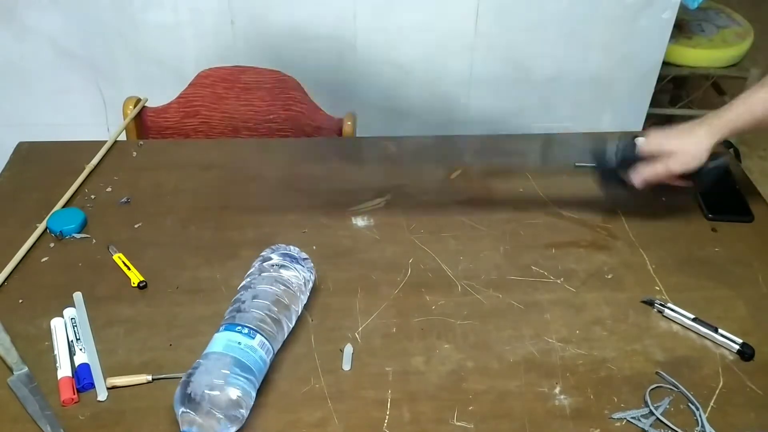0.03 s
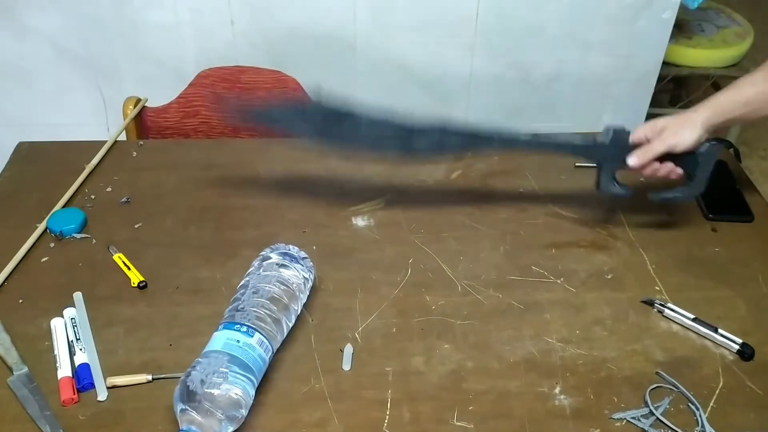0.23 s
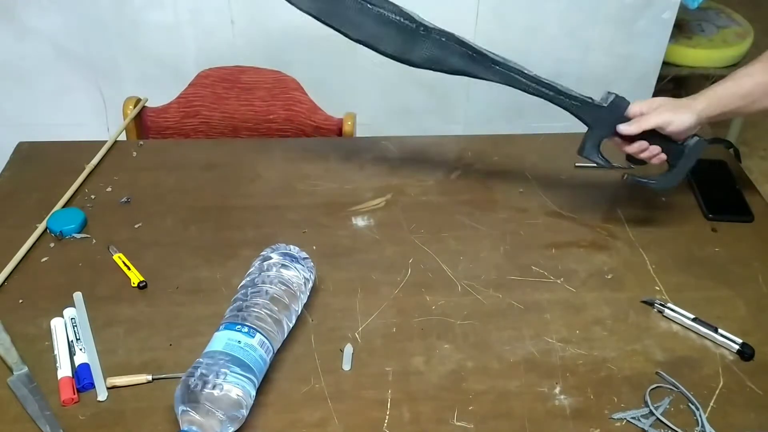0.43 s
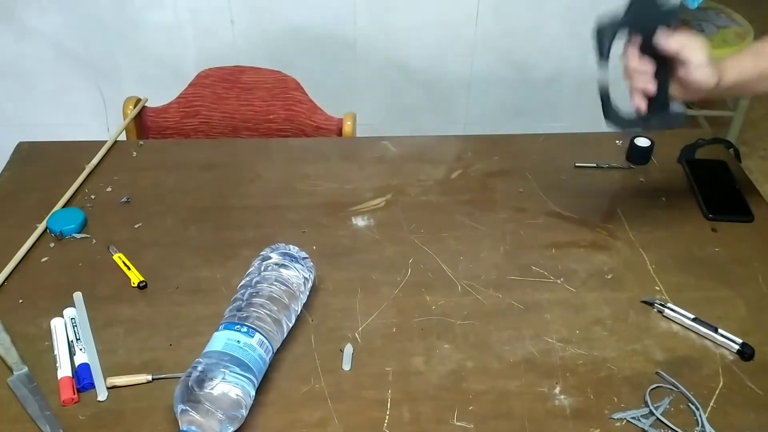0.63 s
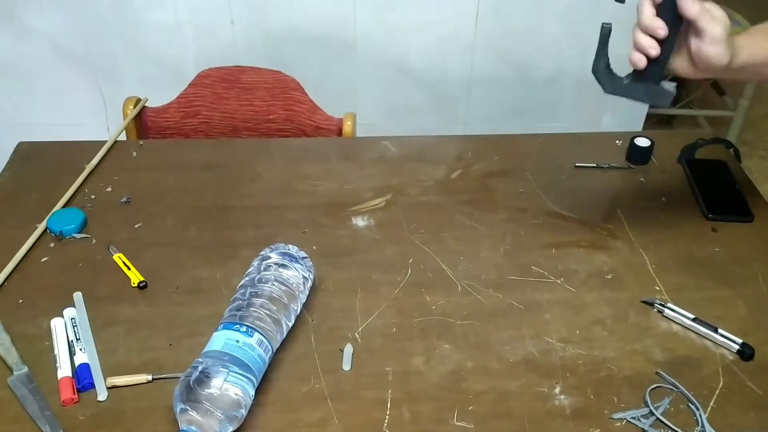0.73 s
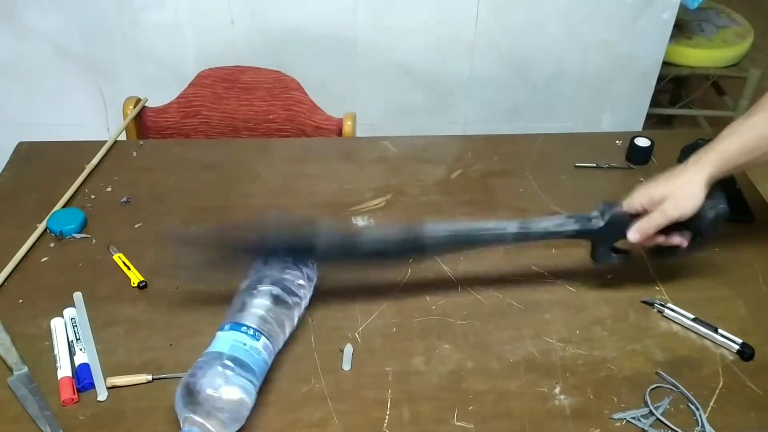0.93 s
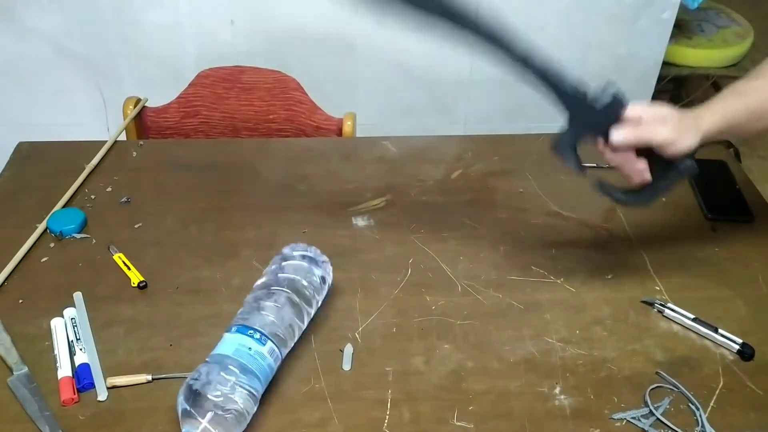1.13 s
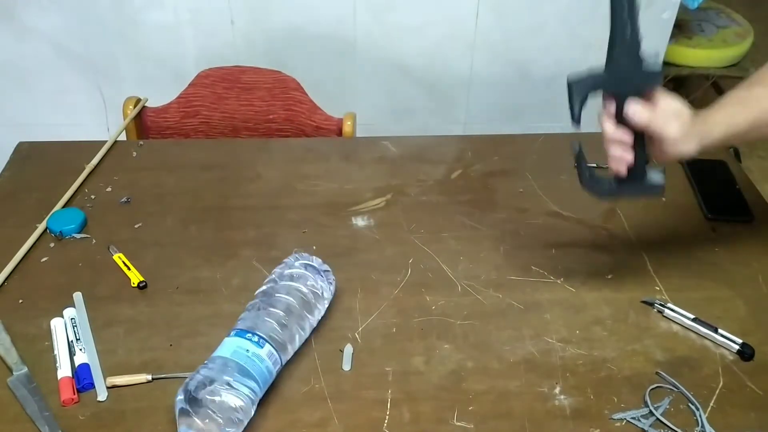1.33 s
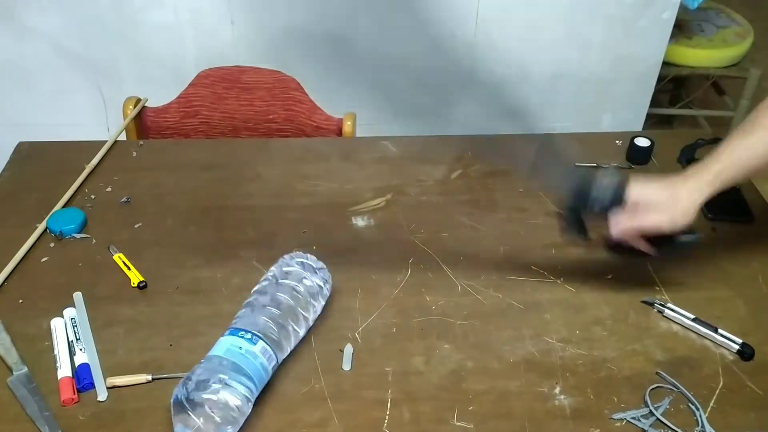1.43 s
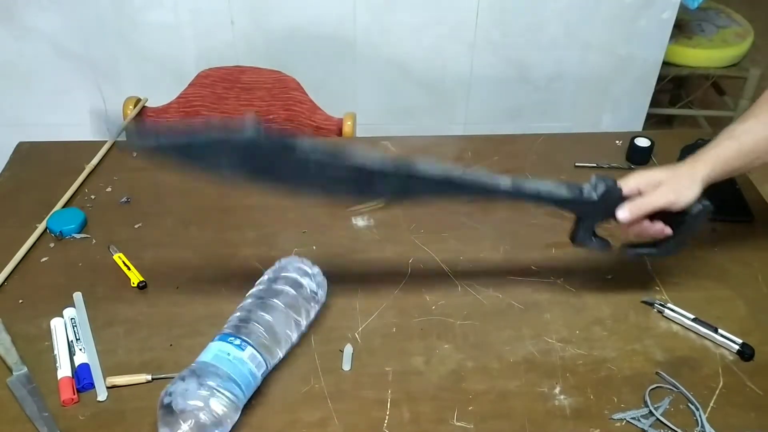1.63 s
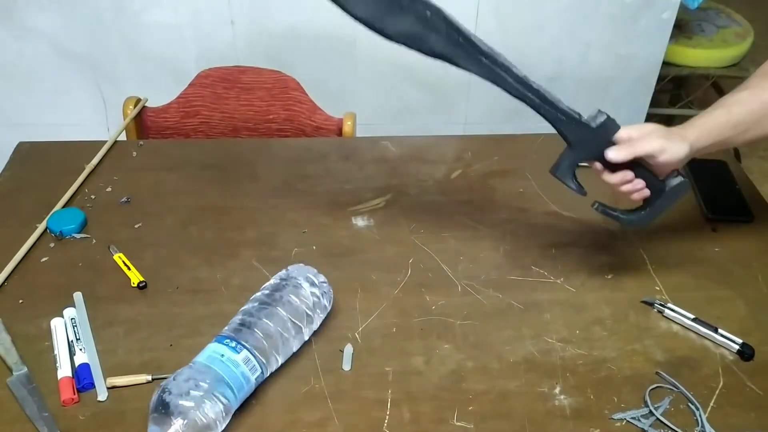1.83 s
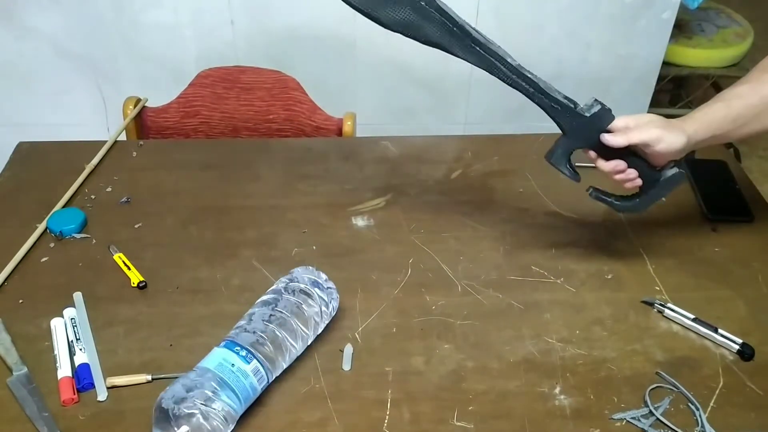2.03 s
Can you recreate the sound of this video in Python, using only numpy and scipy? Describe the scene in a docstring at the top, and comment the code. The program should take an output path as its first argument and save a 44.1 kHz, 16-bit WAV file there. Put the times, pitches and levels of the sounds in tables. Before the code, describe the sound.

A foam sword whacks a wooden table, then slaps a full plastic bottle twice; after each bottle hit it crackles, hops, thuds down and rocks on the wood. Small hard room, close microphone, blows squashed by limiting.

```python
"""In a small hard room, a foam sword slaps a wooden table once, then twice a water-filled plastic bottle on it.
Each slap is a short puff of noise with a bright crack; it sets table and bottle ringing as fading sine waves.
The bottle hops, lands with soft thuds, rocks in dense little knocks and its plastic ticks and crackles.
Faint air noise and a low hum lie beneath; the recorder's limiter flattens each blow."""
import sys
import numpy as np
from scipy import signal
from scipy.fft import rfft, irfft, next_fast_len
from scipy.io import wavfile
from scipy.ndimage import uniform_filter1d, minimum_filter1d

SR = 44100
rng = np.random.default_rng(int(sys.argv[2]) if len(sys.argv) > 2 else 0)


def bounce(signal):
    """Save signal as a 16-bit WAV file at the path given by the first command-line argument."""
    frames = np.transpose(np.atleast_2d(signal))
    limited = np.clip(frames, -1, 1)
    pcm = np.round(limited * 32767).astype(np.int16)
    wavfile.write(sys.argv[1], SR, pcm)


N = 92610

# Levels are those ahead of the limiter; a "fade time" is the time to drop by 60 dB.
# tones of the ringing bottle: (frequency [Hz], relative level [dB], fade time [s])
BOTTLE_TONES = [(59, -6, .5), (146, 0, .55), (200, -6, .4), (260, -5, .4), (506, -6, .3), (662, -7, .3),
                (813, -9, .25), (1030, -11, .2), (1227, -6, .25), (1448, -6, .15), (1626, -8, .2),
                (1888, -8, .13)]
# colour of foam on plastic: (frequency [Hz], relative level [dB])
SLAP_COLOUR = [(35, -26), (60, -9.5), (150, -8), (432, -6.5), (742, -8.5), (938, -9), (1430, -6),
               (10300, -10.5), (15000, -14.5), (16500, -58)]
# colour of a tick or crack: (frequency [Hz], relative level [dB])
TICK_COLOUR = [(2000, 0), (6000, -0.5), (11000, 5.4), (16000, -3)]

SLAP_FADE_S, TICK_FADE_S = 0.0054, 0.003
THUD_RISE_S = 0.005
ROOM_FILL_S = 0.012  # how slowly the room's answer builds up
SLAP_ROOM_DB = 1.5  # room tail relative to the slap itself


def amp(db):
    """Turns decibels into a plain multiplier."""
    return 10 ** (np.asarray(db) / 20)


def unit(x):
    """Scales a sound to an rms (average strength) of 1."""
    return x / np.sqrt(np.mean(x ** 2) + 1e-20)


def along(points, hz):
    """Reads a curve of (frequency, value) points on a logarithmic frequency axis."""
    f, value = np.transpose(points)
    return np.interp(np.log(hz + 1), np.log(f + 1), value)


def filtered(x, response):
    """Multiplies each frequency of a sound by response(frequency)."""
    size = next_fast_len(x.shape[-1] + 8192)
    spectrum = rfft(x, size) * response(np.fft.rfftfreq(size, 1 / SR))
    return irfft(spectrum, size)[..., :x.shape[-1]]


def coloured(noise, colour):
    """Shapes noise to a colour and brings it to rms 1."""
    return unit(filtered(noise, lambda hz: amp(along(colour, hz))))


def stereo_noise(size):
    """Two channels of white noise, alike in the bass and mostly unrelated in the treble."""
    # likeness of left and right: (frequency [Hz], correlation [-1 to 1])
    likeness = [(60, 0.91), (180, 0.98), (550, 0.56), (1650, -0.085), (4970, -0.18), (15000, 0.32)]

    def shares(hz):
        angle = np.arccos(np.clip(along(likeness, hz), -1, 1)) / 2
        return np.array([np.cos(angle), np.sin(angle)])

    mid, side = filtered(rng.standard_normal((2, size)), shares)
    return np.array([mid + side, mid - side])


def room_tail(colour, fill_s):
    """A new stereo room tail: each frequency fades at its own speed and near echoes ripple its spectrum."""
    # how long the room rings: (frequency [Hz], fade time [s])
    fade_times = [(60, 0.49), (160, 0.56), (420, 0.46), (1100, 0.53), (2900, 0.44), (7700, 0.4),
                  (15000, 0.27)]
    ripple_db = 2.5
    noise = coloured(stereo_noise(SR), colour)
    hz, t, z = signal.stft(noise, SR, nperseg=256)
    ripple = ripple_db * rng.standard_normal((len(hz), 1))
    gain = amp(ripple - 60 * t / along(fade_times, hz)[:, None])
    fading = signal.istft(z * gain, SR, nperseg=256)[1][:, :SR]
    return fading * (1 - np.exp(-np.arange(SR) / SR / fill_s))


def in_room(x, wet_db):
    """A sustained sound plus the room's answer to it."""
    tail = room_tail([(1, 0), (SR, 0)], ROOM_FILL_S)
    answer = signal.fftconvolve(x[None], tail / np.linalg.norm(tail[0]), axes=1)[:, :len(x)]
    return x + amp(wet_db) * answer


def add(out, s, x):
    """Mixes x in from time s, cutting off what lies outside the scene."""
    start = round(s * SR)
    part = out[:, max(start, 0):start + x.shape[1]]
    part += x[:, max(-start, 0):][:, :part.shape[1]]


def burst(colour, fade_s, rise_s=1 / SR):
    """A dying puff of coloured noise."""
    t = np.arange(SR) / SR
    noise = coloured(rng.standard_normal(SR), colour)
    return noise * amp(-60 * t / fade_s) * (1 - np.exp(-t / rise_s))


def puff(colour, fade_s, wet_db, fill_s, rise_s=1 / SR):
    """A short contact noise and its tail in the room."""
    return burst(colour, fade_s, rise_s) + amp(wet_db) * room_tail(colour, fill_s)


def ring(tones, rise_s):
    """A struck body sounds as fading sine waves, each at a slightly random level and with a wandering phase."""
    step_cycles = 0.07  # typical random phase step, 50 times a second
    t = np.arange(SR) / SR
    total = np.zeros(SR)
    for hz, db, fade_s in tones:
        level = amp(db + rng.normal(0, 1) - 60 * t / fade_s)
        walk = np.cumsum(rng.standard_normal(51))
        wander = step_cycles * np.interp(t, np.arange(51) / 50, walk)
        total += level * np.sin(2 * np.pi * (hz * t + wander))
    return (1 - np.exp(-t / rise_s)) * total


def add_contact(out, s, noise, table_db, bottle_db, rise_s):
    """A contact: its noise, plus the table and bottle it sets ringing in the room."""
    # tones of the ringing table: (frequency [Hz], relative level [dB], fade time [s])
    table_tones = [(62, -12, .5), (355, -12, .3), (404, -18, .5), (450, -15, .4), (495, -12, .35),
                   (570, -18, .4), (1226, -18, .2), (194, -12, .5), (273, -7, .35), (734, 3, .26),
                   (807, -7, .14), (914, -36, 1.2), (1026, -11, .22), (1082, -33, .8)]
    table = amp(table_db) * ring(table_tones, rise_s)
    bottle = amp(bottle_db) * ring(BOTTLE_TONES, rise_s)
    add(out, s, noise + in_room(table + bottle, wet_db=-9))


def room_tone():
    """Faint air noise in stereo and a wavering low hum made of a narrow band of noise."""
    # colour of the air noise: (frequency [Hz], relative level [dB])
    air_colour = [(18, -19), (30, -1), (196, -2.5), (792, -13.5), (904, -20), (1310, -18.5), (2000, -18.5),
                  (9230, -22), (15200, -28), (16500, -52)]
    air_db, hum_db = -61.5, -66
    hum_hz, hum_width_hz = 198, 5.6
    air = coloured(stereo_noise(N), air_colour)
    hum = unit(filtered(rng.standard_normal(N), lambda hz: np.exp(-((hz - hum_hz) / hum_width_hz) ** 2)))
    return amp(air_db) * air + amp(hum_db) * hum


def rocking():
    """The ribbed bottle rocks on the wood: dense random knocks, each a dull rumble and a short bottle ring."""
    # spells of rocking, each a list of (time [s], level [dB])
    spells = [
        [(0, -35), (0.06, -41), (0.12, -41.5), (0.16, -45), (0.205, -44.5)],
        [(1.33, -43.5), (1.39, -41), (1.45, -43), (1.5, -36), (1.56, -42), (1.615, -33.5)],
        [(1.88, -37.5), (1.93, -39), (1.98, -45), (2.02, -33.5), (2.06, -38.5), (2.1, -40.5)],
    ]
    # colour of one knock: (frequency [Hz], relative level [dB])
    rumble_colour = [(24, -34.5), (40, -7.5), (64, -1.5), (104, -10), (199, 4.5), (422, -16.5), (479, 1.5),
                     (585, -15.5), (751, -9.5), (918, -28), (1210, -12), (1760, -33), (10700, -45),
                     (16000, -41)]
    knocks_per_s, knock_spread_db, knock_fade_s = 300, 3, 0.026
    ring_db = -9  # bottle ring relative to the dull knocks
    damping_s = 0.06  # lying contact cuts the ring short
    happens = rng.random(N) < knocks_per_s / SR
    strength = amp(knock_spread_db * rng.standard_normal(N))
    knocks = happens * strength * rng.choice([-1, 1], N)
    dull = signal.fftconvolve(knocks, burst(rumble_colour, knock_fade_s))[:N]
    damped_ring = ring(BOTTLE_TONES, THUD_RISE_S) * np.exp(-np.arange(SR) / SR / damping_s)
    tonal = signal.fftconvolve(knocks, damped_ring)[:N]
    t = np.arange(N) / SR
    level = sum(amp(np.interp(t, *np.transpose(rows), left=-120, right=-120)) for rows in spells)
    return level * unit(in_room(unit(dull) + amp(ring_db) * unit(tonal), wet_db=3.5))


def plastic_ticks():
    """The dented plastic snaps back with short bright clicks."""
    # (time [s], level [dB], room tail relative to the click [dB])
    clicks = [(0.618, -60, 1), (0.77, -60.5, -6.5), (1.2585, -11.5, -19.5), (1.405, -40, -12.5),
              (1.4511, -40.5, -1.5), (1.495, -50, -6.5), (1.5716, -39.5, -6.5), (1.586, -35.5, -7),
              (1.7825, -13, -18), (1.876, -32.5, -9), (2.0189, -35.5, -16.5), (2.069, -43.5, -1)]
    out = np.zeros((2, N))
    for s, db, wet_db in clicks:
        add(out, s, amp(db) * puff(TICK_COLOUR, TICK_FADE_S, wet_db, ROOM_FILL_S))
    return out


def landings():
    """The bottle lands or tips onto the table: a soft-edged thud and both bodies' ring."""
    # (time [s], thud level [dB], table ring [dB], bottle ring [dB])
    falls = [(-0.1, -30, -43.5, -45.5), (0.141, -53.5, -67, -42.5), (1.243, -22, -31.5, -26.5),
             (1.37, -40, -49, -36.5), (1.503, -52, -45, -66), (1.533, -46, -54, -42),
             (1.765, -18.5, -32.5, -31), (1.85, -52, -57, -66), (2.005, -46, -55, -42)]
    # colour of a thud: (frequency [Hz], relative level [dB])
    thud_colour = [(35, -29), (60, -7.5), (283, 3), (834, -9), (916, -8.5), (9610, -14.5), (14700, -22),
                   (16500, -47.5)]
    out = np.zeros((2, N))
    for s, db, table_db, bottle_db in falls:
        thud = puff(thud_colour, fade_s=0.02, wet_db=0.5, fill_s=0.014, rise_s=THUD_RISE_S)
        add_contact(out, s, amp(db) * thud, table_db, bottle_db, THUD_RISE_S)
    return out


def crack(db, pan_db):
    """The bright first instant of a blow, louder on the left for a positive pan."""
    return amp([[db + pan_db / 2], [db - pan_db / 2]]) * burst(TICK_COLOUR, TICK_FADE_S)


def crunch(rise_s):
    """The dented wall crackles after a blow: irregular dying snaps, scattered left and right."""
    snaps_per_s, level_db, decay_s = 500, -7, 0.035
    t = np.arange(SR) / SR
    noise = coloured(stereo_noise(SR), SLAP_COLOUR)
    snaps = (rng.random(SR) < snaps_per_s / SR) * rng.exponential(size=SR)
    one_snap = amp(-60 * t[:SR // 50] / SLAP_FADE_S)
    crackle = noise * np.convolve(snaps, one_snap)[:SR]
    return crackle * amp(level_db) * np.exp(-t / decay_s) * (1 - np.exp(-t / rise_s))


def table_blows():
    """The sword hits the table: a smack of foam on wood, a crack and the ring."""
    # (time [s], smack [dB], crack [dB], table ring [dB], bottle ring [dB], left over right [dB], rise [s])
    hits = [(0.209, -10.5, -12.5, -9.5, -42.5, 5.5, 0.0012)]
    # colour of foam on wood: (frequency [Hz], relative level [dB])
    smack_colour = [(35, -48), (60, -19.5), (475, -9), (600, -15.5), (742, -7.5), (834, -10.5),
                    (1030, -11.5), (1430, -22), (15000, -26.5), (16500, -67.5)]
    out = np.zeros((2, N))
    for s, db, crack_db, table_db, bottle_db, pan_db, rise_s in hits:
        smack = amp(db) * puff(smack_colour, SLAP_FADE_S, SLAP_ROOM_DB, fill_s=rise_s)
        add_contact(out, s, smack + crack(crack_db, pan_db), table_db, bottle_db, rise_s)
    return out


def bottle_blows():
    """The sword hits the bottle: a slap of foam on plastic, crackling, a crack and the ring."""
    # (time [s], slap [dB], crack [dB], table ring [dB], bottle ring [dB], left over right [dB], rise [s])
    hits = [(1.0742, -7.5, -7.5, -21, -17, 4.5, 0.005), (1.6209, -7, -5.5, -28.5, -20, 1.5, .01)]
    out = np.zeros((2, N))
    for s, db, crack_db, table_db, bottle_db, pan_db, rise_s in hits:
        slap = puff(SLAP_COLOUR, SLAP_FADE_S, SLAP_ROOM_DB, rise_s, rise_s)
        noise = amp(db) * (slap + crunch(rise_s)) + crack(crack_db, pan_db)
        add_contact(out, s, noise, table_db, bottle_db, rise_s)
    return out


def scene():
    """All the sounds together, from the background to the blows."""
    return room_tone() + rocking() + plastic_ticks() + landings() + table_blows() + bottle_blows()


def record(dry):
    """A peak limiter shared by both channels, the microphone's bass roll-off and a treble limit."""
    ceiling_db, mic_low_hz, top_hz = 0, 47, 16700
    hold, smooth = round(0.017 * SR), round(0.001 * SR)  # seconds to samples
    needed = np.minimum(1, amp(ceiling_db) / (np.abs(dry).max(0) + 1e-9))
    # the gain drops just ahead of a peak and stays down for the hold time
    held = minimum_filter1d(needed, hold + smooth, origin=(hold - smooth) // 2)
    gain = uniform_filter1d(held, smooth)
    lowcut = signal.butter(4, mic_low_hz, "high", fs=SR, output="sos")
    return filtered(signal.sosfilt(lowcut, dry * gain), lambda hz: hz < top_hz)


dry = scene()
out = record(dry)
bounce(out)
```